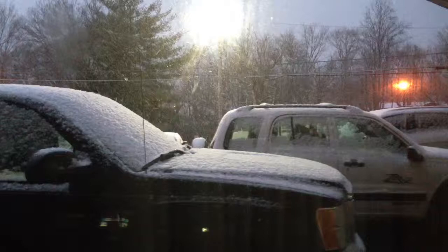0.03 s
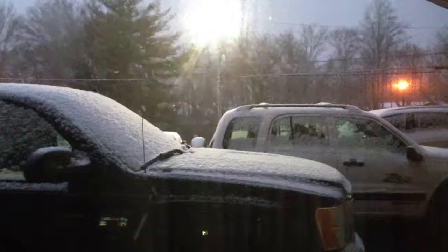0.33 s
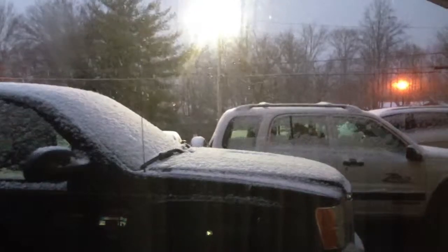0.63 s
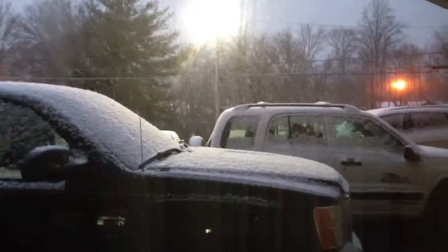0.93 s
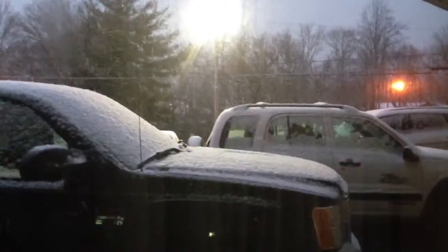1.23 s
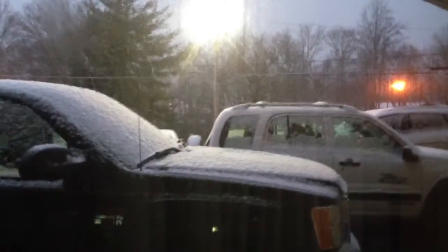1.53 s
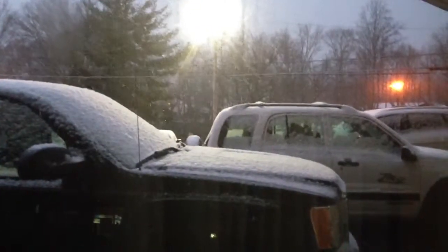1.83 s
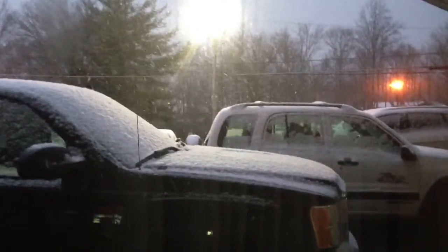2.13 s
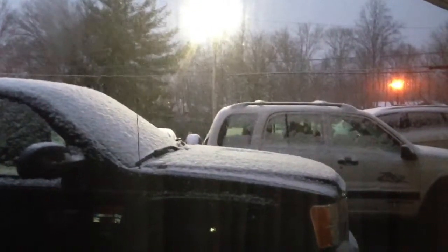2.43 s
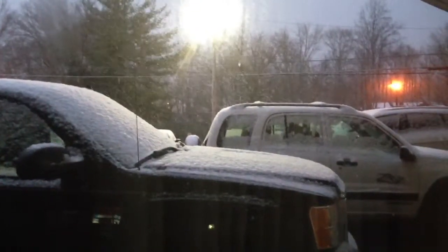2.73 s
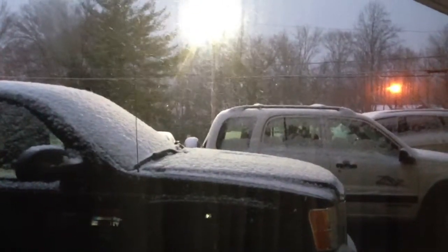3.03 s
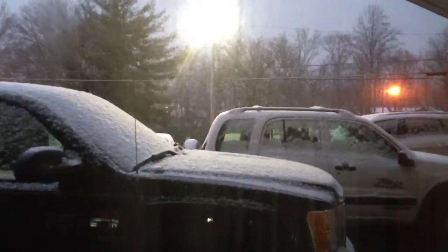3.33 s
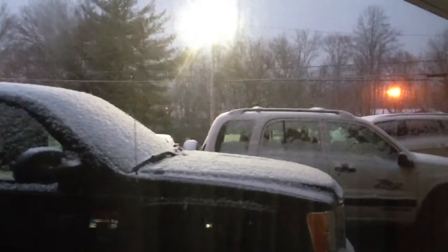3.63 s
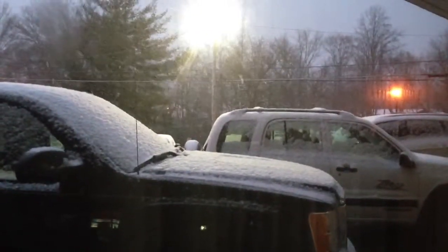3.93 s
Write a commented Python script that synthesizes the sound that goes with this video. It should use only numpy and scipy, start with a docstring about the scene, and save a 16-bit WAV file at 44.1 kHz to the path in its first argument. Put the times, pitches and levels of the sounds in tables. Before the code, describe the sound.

Steady low refrigerator hum with a fluttering hollow fan tone and faint hiss.

```python
"""A cooling unit, probably a refrigerator, running steadily in a room that looks out on a parking lot.
Its compressor turns just under mains speed, so its hum beats slowly against the mains hum; the casing
buzzes and ticks faintly. A fan pushes air through a duct with one hollow, fluttering resonance.
Two faint whines and a thin hiss lie behind it all. One microphone, mono, standing in one spot."""
import sys
import numpy as np
from scipy import signal
from scipy.fft import rfft, irfft
from scipy.io import wavfile

SR = 44100
rng = np.random.default_rng(int(sys.argv[2]) if len(sys.argv) > 2 else 0)


def inscribe(sig):
    """Save sig as 16-bit PCM at rate SR to the path in sys.argv[1].

    A 1-D sig is mono; a 2-D sig holds one channel per row.
    Samples are clipped to [-1, 1] before scaling.
    """
    pcm = np.round(np.clip(np.atleast_2d(sig).T, -1, 1) * 32767)
    wavfile.write(sys.argv[1], SR, pcm.astype(np.int16))


N = 176400
TIME = np.arange(N) / SR

MOTOR_HZ, MAINS_HZ = 58.56, 60
BEAT_CREST_S = .5   # motor and mains hum are in step here
FLUTTER_HZ = 6.6   # how fast the air and the hiss flicker in level


def compressor():
    """Motor partials that waver slightly; the second one beats with the magnetic hum of the mains."""
    # Each row: multiple of the motor's turning rate, level in dB.
    partials = [(2, -62), (3, -60), (4, -52.5), (5, -74.5), (6, -61.5), (12, -88), (13, -81.5), (14, -74.5),
                (15, -74), (16, -73.5), (17, -77), (18, -85), (19, -82), (22, -99), (23, -88.5),
                (25, -87.5), (28, -87), (32, -90.5), (49, -98), (50, -100), (59, -93), (60, -89),
                (64, -91.5), (65, -89), (69, -90), (73, -90.5), (78, -98)]
    # The beating pair sinks and rises. Each row: time in seconds, level change in dB.
    deep_hum = [(.1, -4), (1.1, 2.5), (1.9, -1), (2.3, -3.5), (2.75, -2.5), (3.05, 2), (3.9, 3)]
    mains_db, waver_spread_db = -66.5, 1.5
    deep_db = in_time(deep_hum)
    hum = tone(2 * MAINS_HZ, mains_db + deep_db)
    for order, db in partials:
        waver_db = waver_spread_db * drift(rate_hz=1.8)
        phase = rng.random()
        if order == 2:
            hum += tone(order * MOTOR_HZ, db + deep_db)
        else:
            hum += tone(order * MOTOR_HZ, db + waver_db, phase)
    return hum


def casing_buzz():
    """The casing buzzes in a comb of weak, uneven high partials locked to the motor."""
    # Each row: frequency in Hz, typical level in dB of a partial there.
    outline = [(1200, -99), (2300, -104), (2900, -101), (3500, -100), (4500, -102), (6000, -107)]
    scatter_db = 3.5
    return sum(tone(hz, at_hz(outline, hz) + scatter_db * rng.standard_normal(), rng.random())
               for hz in MOTOR_HZ * np.arange(20, 100))


def fan():
    """The fan drives a low rush of air with a few steady tones."""
    # Each row: frequency in Hz, level of the rush in dB per Hz.
    air_spectrum = [(25, -91), (50, -104), (80, -104), (105, -88.5), (125, -84), (145, -78.5), (205, -75),
                    (255, -76), (290, -74.5), (355, -75.5), (420, -78.5), (470, -80), (515, -84.5),
                    (620, -89), (780, -90), (900, -95), (1080, -94), (1190, -105), (1500, -104),
                    (1900, -110), (3000, -122)]
    # Each row: pitch in Hz, level in dB.
    fan_tones = [(132.9, -64), (336.7, -69), (622.8, -79.5)]
    rush = fluttering_noise(air_spectrum, flutter_db=.68)
    return rush + sum(tone(hz, db, rng.random()) for hz, db in fan_tones)


def air_rumble():
    """The low rush thickens briefly in a narrow band, now lower, now higher."""
    # Each row: peak time in seconds, length in seconds, band centre in Hz, peak level in dB.
    swells = [(0.276, 0.078, 177, -68), (.67, .09, 176, -51), (0.755, 0.13, 239, -52.5),
              (1.026, .09, 349.9, -56), (1.661, 0.079, 239.8, -46), (1.748, 0.14, 177.9, -50),
              (2.47, .2, 200.4, -59.5), (3.301, .08, 252.9, -53.5), (3.503, .13, 194.9, -54),
              (3.888, .16, 180, -56.5)]
    width_hz = 19.4
    rumble = np.zeros(N)
    for peak_s, length_s, hz, db in swells:
        band = rms_one(noise(lambda f: 1 / (1 + (2 * (f - hz) / width_hz) ** 4)))
        rumble += from_db(db) * swell(peak_s, length_s) * band
    return rumble


def duct():
    """Turbulence keeps the duct and panels ringing, so each resonance flutters."""
    # Each row: resonance in Hz, width in Hz, level in dB.
    modes = [(564, 37, -59), (350.4, 4.6, -65.5), (674.4, 11, -72), (1358, 33, -81), (1637, 42, -82)]
    return sum(from_db(db) * ringing(hz, width_hz) for hz, width_hz, db in modes)


def duct_whistle():
    """The airflow half sustains a hollow tone on the main duct resonance, in swells of varying pitch."""
    # Each row: peak time in seconds, length in seconds, peak level in dB, pitch in Hz.
    swells = [(0.072, 0.052, -47, 565), (0.184, .065, -45.5, 558.7), (.235, 0.046, -47.5, 559),
              (0.308, 0.034, -51, 566.8), (0.381, 0.022, -49, 563), (0.433, .05, -57, 557.1),
              (0.492, 0.058, -47, 560), (0.603, 0.092, -49, 565), (0.686, .025, -54, 560),
              (0.746, 0.054, -48, 560), (0.87, .05, -49, 562), (.92, 0.017, -50.5, 564),
              (.97, 0.029, -46.5, 562), (1.015, 0.053, -50.5, 558), (1.06, 0.03, -52, 557),
              (1.134, 0.057, -46, 564), (1.21, .05, -45.5, 557.7), (1.285, 0.079, -46, 559),
              (1.361, .05, -47, 565), (1.425, 0.049, -47, 563.7), (1.511, .07, -47, 560.6),
              (1.57, 0.035, -59, 571.5), (1.678, 0.028, -51.5, 568), (1.788, 0.058, -47.5, 555.5),
              (1.865, 0.064, -47, 558), (2.001, 0.093, -49.5, 563), (2.069, 0.048, -46, 561),
              (2.116, .06, -46.5, 558), (2.222, .08, -49.5, 564), (2.285, 0.061, -52, 562),
              (2.36, 0.047, -46, 558), (2.48, 0.042, -60, 560.5), (2.56, 0.065, -49, 566),
              (2.606, 0.072, -51.5, 563), (2.664, 0.052, -49.5, 562.7), (2.745, 0.057, -50, 559),
              (2.8, 0.037, -53.5, 565), (2.89, 0.063, -48.5, 565.8), (3.006, 0.048, -49.5, 556),
              (3.068, 0.058, -46.5, 559.6), (3.15, 0.043, -59, 558), (3.27, 0.062, -46, 563.3),
              (3.385, 0.027, -51.5, 562.5), (3.452, .045, -46.5, 555), (3.554, 0.065, -49, 564.6),
              (3.683, 0.081, -47.5, 561), (3.884, 0.069, -48.5, 561), (3.938, 0.038, -55.5, 565.5)]
    rest_db, wander_hz = -60, 3.27
    swell_power = sum((from_db(db) * swell(peak_s, length_s)) ** 2 for peak_s, length_s, db, _ in swells)
    power = from_db(rest_db) ** 2 + swell_power
    pitch = in_time([(peak_s, hz) for peak_s, _, _, hz in swells])
    pitch += wander_hz * drift(rate_hz=27.4)
    return np.sqrt(2 * power) * np.sin(2 * np.pi * np.cumsum(pitch) / SR)


def whine():
    """Two faint, high resonances, each swelling once towards the end."""
    # Each row: pitch in Hz, width in Hz, steady level in dB, then the swell's
    # peak time in seconds, length in seconds and rise in dB.
    modes = [(2105, 51, -81.5, 3.33, .45, 4.5), (2890, 54, -92, 3.573, 0.3, 11)]
    return sum(from_db(db + rise_db * swell(peak_s, length_s)) * ringing(hz, width_hz)
               for hz, width_hz, db, peak_s, length_s, rise_db in modes)


def casing_ticks():
    """The casing ticks softly: short bursts of noise in the upper middle range."""
    # Each row: start in seconds, peak level in dB per Hz ahead of the filters, decay in seconds.
    ticks = [(.124, -89, 0.0023), (.55, -100, .045), (.745, -100, 0.006), (1.826, -101, 0.013),
             (2.364, -96, 0.014), (3.05, -100, 0.022)]
    centre_hz, dull_hz = 1800, 3800
    bursts = sum(from_db(db) * (TIME >= start_s) * np.exp(-abs(TIME - start_s) / decay_s)
                 for start_s, db, decay_s in ticks)

    def colour(f):
        band = 2 * (f / centre_hz) / (1 + 1j * f / centre_hz) ** 2
        return band / (1 + (f / dull_hz) ** 4)

    return bursts * noise(colour)


def hiss():
    """A thin, faint broadband hiss in the background."""
    # Each row: frequency in Hz, level in dB per Hz.
    hiss_spectrum = [(100, -116), (1000, -106), (2500, -105.5), (4000, -106.5), (5500, -109), (7500, -111),
                     (11000, -112), (14000, -112)]
    return fluttering_noise(hiss_spectrum, flutter_db=.45)


def from_db(db):
    """Decibels to gain."""
    return 10 ** (np.asarray(db) / 20)


def rms_one(x):
    """Scale to an rms of 1."""
    return x / np.sqrt(np.mean(x ** 2) + 1e-30)


def at_hz(points, hz):
    """Read a spectrum table on a log-frequency axis."""
    table = np.array(points)
    return np.interp(np.log(np.maximum(hz, 1)), np.log(table[:, 0]), table[:, 1])


def in_time(rows):
    """Join (seconds, value) points by straight lines."""
    return np.interp(TIME, *np.transpose(rows))


def swell(peak_s, length_s):
    """A smooth rise and fall around a moment; the length is taken at half height."""
    return .5 ** np.minimum((2 * (TIME - peak_s) / length_s) ** 2, 60)


def tone(hz, db, phase=0):
    """A sine of the given rms level; the phase is in turns from the crest of the beat."""
    return np.sqrt(2) * from_db(db) * np.cos(2 * np.pi * (hz * (TIME - BEAT_CREST_S) + phase))


def noise(gain_at):
    """White noise of unit power per Hz, coloured by a gain that depends on frequency."""
    white = rfft(rng.standard_normal(N))
    hz = np.arange(len(white)) * SR / N
    return irfft(white * gain_at(hz), N) * np.sqrt(SR / 2)


def drift(rate_hz):
    """A random wander with a spread of 1, mostly slower than the given rate."""
    return rms_one(noise(lambda f: (f > 0) / (1 + (f / rate_hz) ** 2)))


def fluttering_noise(spectrum, flutter_db):
    """Noise shaped by a spectrum table, flickering slightly in level."""
    steady = noise(lambda f: from_db(at_hz(spectrum, f)))
    return steady * from_db(flutter_db * drift(FLUTTER_HZ))


def ringing(hz, width_hz):
    """Noise of rms 1 in a narrow resonance whose skirts steepen four widths out."""
    def resonance(f):
        detune = (f - hz) / width_hz
        return 1 / ((1 + 2j * detune) * (1 + 1j * detune / 4))

    return rms_one(noise(resonance))


def scene():
    """All parts of the machine, heard from one spot in the room."""
    machine = compressor() + casing_buzz() + fan() + air_rumble() + duct() + duct_whistle()
    return (machine + whine() + casing_ticks() + hiss())[None]


def record(dry):
    """The microphone opens after a moment; deep bass and the very top are cut."""
    start_s, fade_s = .0835, .001
    low_cut_hz, high_cut_hz = 57, 14500
    opened = dry * np.clip((TIME - start_s) / fade_s, 0, 1)
    thinned = signal.sosfilt(signal.butter(3, low_cut_hz, "high", fs=SR, output="sos"), opened)
    return signal.sosfilt(signal.ellip(12, .1, 80, high_cut_hz, fs=SR, output="sos"), thinned)


dry = scene()
out = record(dry)
inscribe(out)
```